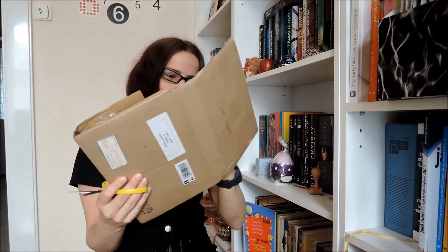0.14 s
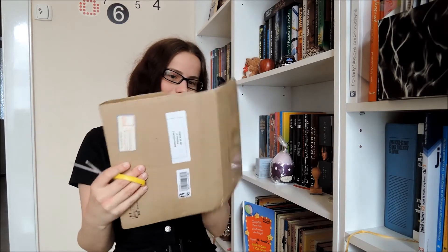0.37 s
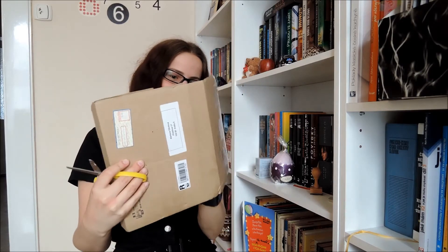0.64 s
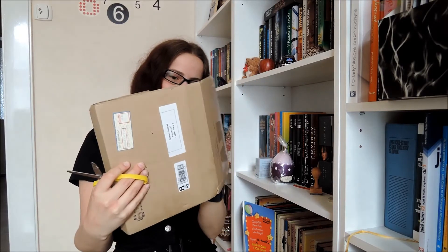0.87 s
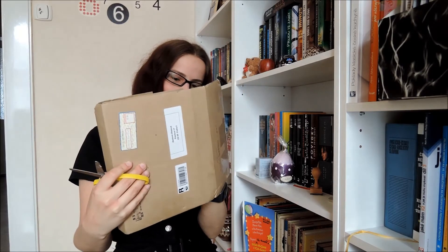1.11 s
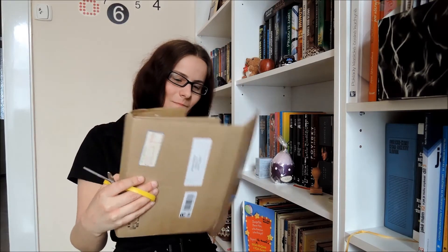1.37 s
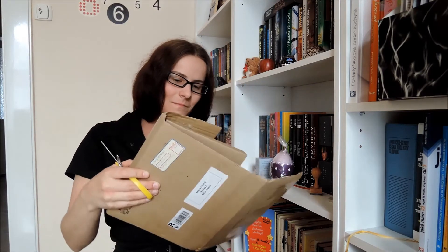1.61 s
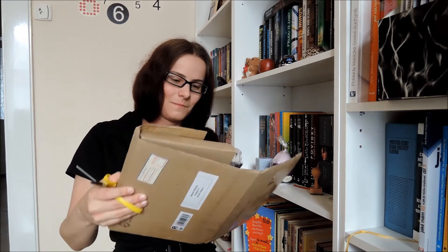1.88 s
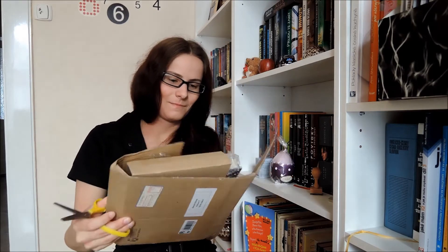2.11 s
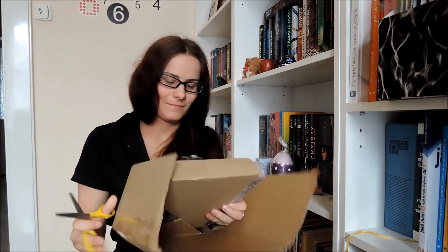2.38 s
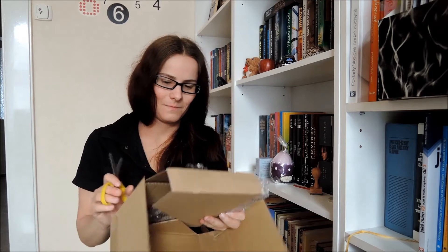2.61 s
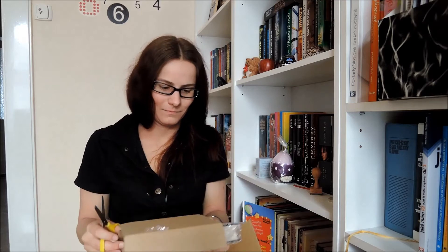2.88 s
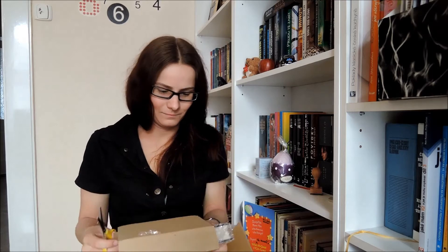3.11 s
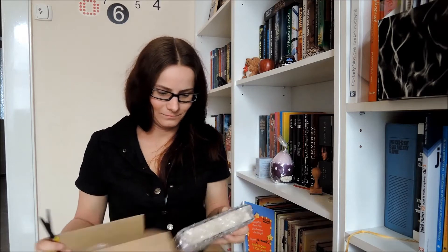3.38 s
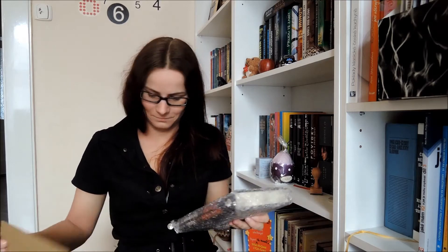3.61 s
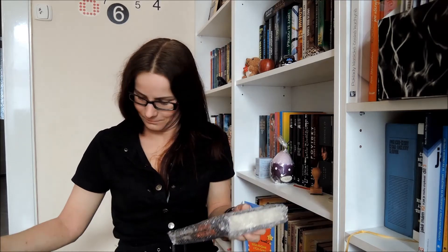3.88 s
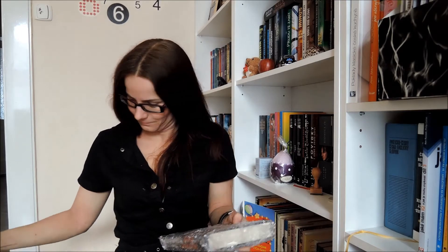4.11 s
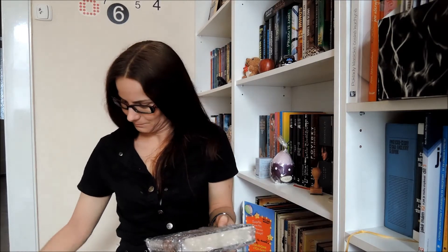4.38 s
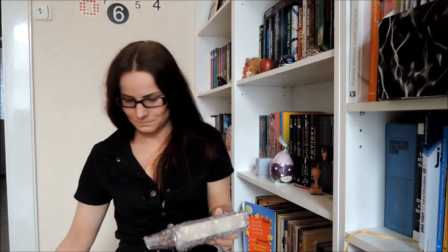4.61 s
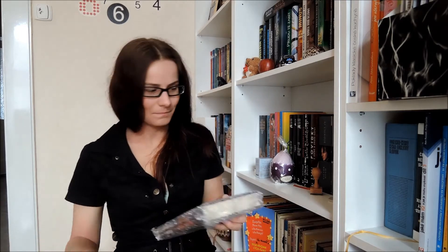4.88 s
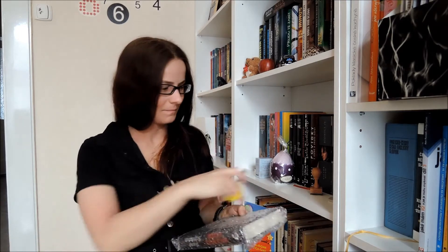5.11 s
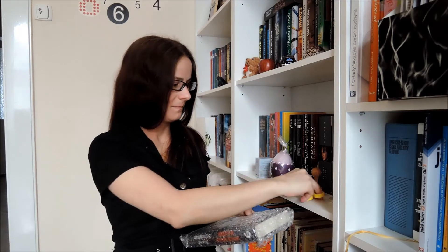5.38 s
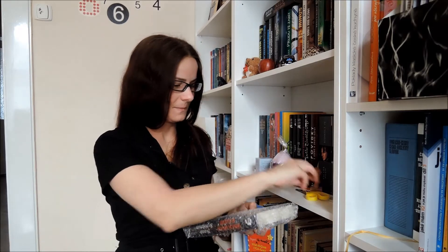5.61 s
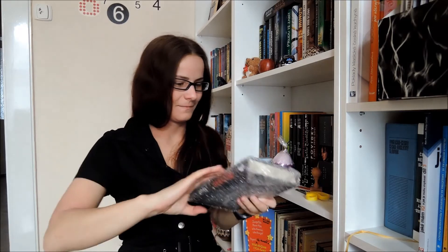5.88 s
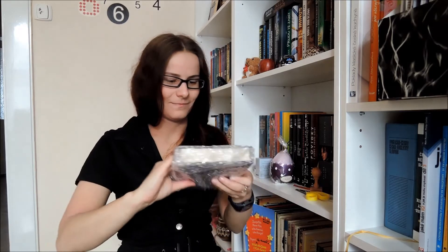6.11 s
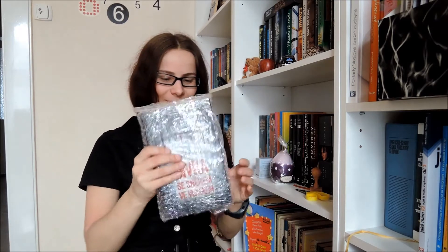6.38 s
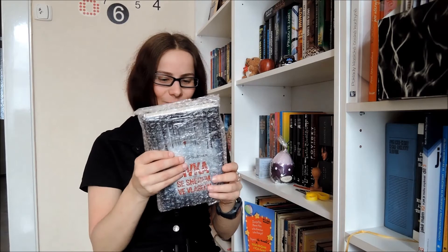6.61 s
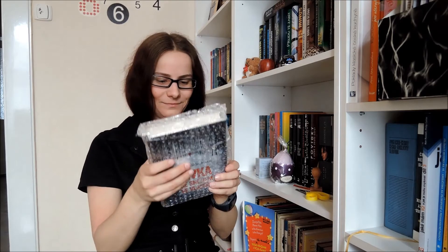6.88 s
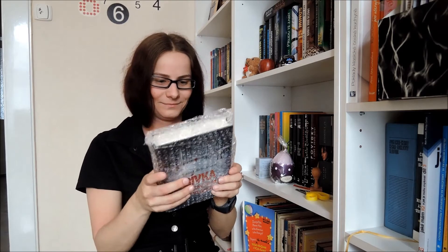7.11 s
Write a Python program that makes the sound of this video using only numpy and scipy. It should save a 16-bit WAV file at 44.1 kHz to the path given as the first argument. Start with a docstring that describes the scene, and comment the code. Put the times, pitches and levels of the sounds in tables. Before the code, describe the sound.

A cardboard parcel is rustled, creased and thumped down, scissors clack onto a shelf, then bubble wrap crackles softly in a small room.

```python
"""A cardboard parcel is folded open and put down in a small furnished room, heard in stereo by close
microphones: clumped slips of card on card feed rubs and hiss, struck resonances make the snapping creases and
hollow thuds. A book is pulled out of its slot with rasping narrow noise; scissors laid on a shelf clack as a
bank of ringing modes. Last, a book in bubble wrap is turned in the hands: grainy crackle and short pops. Delays
give the room's answer, and shaped noise with a wavering hum gives its tone."""
import sys
import numpy as np
from scipy import signal
from scipy.io import wavfile

SR = 44100
rng = np.random.default_rng(int(sys.argv[2]) if len(sys.argv) > 2 else 0)


def wrap_up_sound(samples):
    """Save the sound to the file named by the first command line argument, as 16-bit audio."""
    columns = np.atleast_2d(samples).T
    # keep every value between -1 and 1, then stretch to whole-number steps
    tamed = np.clip(columns, -1, 1)
    steps = np.round(tamed * 32767).astype(np.int16)
    wavfile.write(sys.argv[1], SR, steps)


def decibels_to_gain(level_db):
    """Convert a level in decibels to a linear amplitude gain (20 dB per decade)."""
    exponent = np.asarray(level_db, float) / 20
    return 10 ** exponent


N = 319284  # samples


def rms_one(x):
    """Scale to rms 1."""
    return x / np.sqrt(np.mean(x ** 2) + 1e-20)


def in_time(rows):
    """Columns of a table over time, joined by straight lines and held beyond the ends."""
    s, *columns = np.transpose(rows)
    return [np.interp(np.arange(N) / SR, s, column) for column in columns]


def at_hz(points, hz):
    """Read a spectrum on a log-frequency axis."""
    table_hz, table_db = np.transpose(points)
    return np.interp(np.log(hz), np.log(table_hz), table_db)


def drift(rate_hz):
    """Slow random wander of spread 1: noise through two equal poles, computed every 40 samples."""
    r = np.exp(-2 * np.pi * rate_hz * 40 / SR)
    noise = rng.standard_normal(N // 40 + 2002)
    slow = signal.lfilter([1], [1, -2 * r, r * r], noise)[2000:]  # skip the settling
    return np.interp(np.arange(N) / 40, np.arange(len(slow)), rms_one(slow))


def ring(clicks, hz, t60_s):
    """A two-pole resonance: a unit click sets a decaying sine of height 1 ringing."""
    r, w = decibels_to_gain(-60 / (t60_s * SR)), 2 * np.pi * hz / SR
    return signal.lfilter([0, np.sin(w)], [1, -2 * r * np.cos(w), r * r], clicks + 1e-18)


def add(out, s, sound):
    """Lay a short sound into the track."""
    i = round(s * SR)
    out[i:i + len(sound)] += sound[:N - i]


def slips(per_s, spread_db, clump_db):
    """Surfaces catch and let go: clumped clicks of uneven size, rms 1."""
    sizes = decibels_to_gain(spread_db * np.minimum(rng.exponential(1, N), 5)) * rng.choice([-1, 1], N)
    chance = per_s * decibels_to_gain(clump_db * drift(25)) / SR
    return rms_one(sizes * (rng.random(N) < chance))


SWELL_DB = 20  # a gesture rises by this much in its rise time and sinks as much in its fade time


def gestures(rows):
    """Every row swells to its peak and fades, straight in dB; powers add, one gain track per level column."""
    t, power = np.arange(0, N, 32) / SR, 1e-12
    for peak_s, rise_s, fade_s, *levels_db in rows:
        below_db = SWELL_DB * np.where(t < peak_s, (peak_s - t) / rise_s, (t - peak_s) / fade_s)
        power = power + decibels_to_gain(2 * (np.array(levels_db)[:, None] - below_db))
    return [np.interp(np.arange(N) / SR, t, np.sqrt(p)) for p in power]


# How alike the two microphone channels are. Each row: frequency in Hz, left-right likeness from -1 to 1.
LIKENESS = [(60, 0.84), (500, 0.057), (2000, 0.51), (4000, 0.48), (8000, -0.2)]
NEAR_SPREAD = 0.24  # things in the hands sound narrower than the room tone


def surface(spectrum, patchy_db, grains, grainy, spread=NEAR_SPREAD):
    """Noise and grains in 0.4-octave bands, each with its own level, flicker and stereo likeness; rms 1."""
    out, together = 0, drift(18)
    low_hz, high_hz = spectrum[0][0], spectrum[-1][0]
    edges = low_hz * 2 ** np.arange(0, np.log2(high_hz / low_hz) + .2, .4)
    share = np.clip(grainy, 0, 1)
    # two mid-and-side pairs, so that neighbouring bands draw on different noise
    source = np.sqrt(1 - share) * rng.standard_normal((2, 2, N))
    source[:, 0] += np.sqrt(share) * grains * [[1], [-1]]
    # grains reach the side 9 samples late, with random signs
    source[:, 1] += np.sqrt(share) * np.roll(grains, 9) * rng.choice([-1, 1], N)
    for k, (low, high) in enumerate(zip(edges, edges[1:])):
        band = signal.butter(2, [low, high], "band", fs=SR, output="sos")
        mid, side = signal.sosfilt(band, source[k % 2])
        hz = np.sqrt(low * high)
        alike = np.clip(1 - spread * (1 - at_hz(LIKENESS, hz)), -1, 1)
        flicker_db = patchy_db * (.7 * together + drift(9))
        stereo = np.sqrt(1 + alike) * mid + np.sqrt(1 - alike) * side * [[1], [-1]]
        out = out + decibels_to_gain(at_hz(spectrum, hz) + flicker_db) * stereo
    return rms_one(out)


def card_modes(fibres, spectrum, low_hz, high_hz, count, cycles, wander_db):
    """The grip keeps changing, so many close modes of the card come and go under the slips; rms 1."""
    total = 0
    for hz in np.geomspace(low_hz, high_hz, count) * (1 + .03 * rng.standard_normal(count)):
        level = decibels_to_gain(at_hz(spectrum, hz) + wander_db * drift(6.1))
        # sqrt(hz): modes lie further apart higher up, so each stands for a wider band
        total = total + level * np.sqrt(hz) * rms_one(ring(fibres, hz, cycles / hz))
    return rms_one(total)


# The parcel keeps moving in the hands. Each row: time in seconds, rubbing level in dB, surface hiss in dB.
MOVING = [(0.0, -46, -44), (0.33, -45, -48.5), (0.5, -55.5, -73), (1.39, -65, -64), (1.62, -57.5, -64.5),
          (1.88, -52.5, -51.5), (2.22, -47, -47), (2.45, -55, -47), (2.74, -45.5, -42), (2.86, -46, -45.5),
          (3.15, -46, -54), (3.5, -46.5, -40), (3.69, -50.5, -58), (4.12, -97, -124), (4.6, -92.5, -71),
          (5.06, -49.5, -68), (5.14, -48, -50.5), (5.33, -54, -54.5), (5.5, -66, -92), (5.95, -72, -68)]
# Single rubs of card, hand or shelf. Each row: peak, rise and fade in seconds, rubbing in dB, hiss in dB.
RUBS = [(0.18, 0.0055, 0.11, -32.5, -38), (0.38, 0.15, 0.086, -34, -48), (0.56, 0.0092, 0.23, -48, -58),
        (0.63, 0.061, 0.25, -70, -48.5), (0.79, 0.025, 0.22, -54.5, -58), (0.92, 0.011, 0.5, -61, -63),
        (1.02, 0.0092, 0.21, -43, -47), (1.48, 0.14, 0.39, -44.5, -50.5), (1.95, 0.05, 0.059, -38.5, -43),
        (2.39, 0.1, 0.096, -42.5, -41), (2.58, 0.045, 0.43, -46.5, -43.5), (2.83, 0.2, 0.015, -38, -40.5),
        (3.02, 0.28, 0.14, -41, -39), (3.2, 0.058, 0.074, -41, -38.5), (3.61, 0.15, 0.057, -34.5, -44),
        (3.735, 0.059, 0.35, -50.5, -52), (4.18, 0.011, 0.13, -47.5, -50), (4.638, 0.0033, 0.57, -36, -45),
        (4.7, 0.094, 0.16, -35.5, -42.5), (4.795, 0.033, 0.14, -43, -47.5),
        (4.927, 0.017, 0.083, -33.5, -57.5), (5.349, 0.015, 0.14, -39, -74), (5.51, 0.0023, 0.35, -42, -56)]
# Shoves that bend the parcel. Each row: peak, rise and fade in seconds, panel flex in dB, hollow box in dB.
SHOVES = [(0.05, 0.082, 0.99, -54, -57), (0.19, 0.042, 0.24, -64, -54), (0.41, 0.31, 0.055, -47, -48),
          (1.01, 0.0082, 0.46, -65, -60), (1.48, 0.035, 1, -69, -58), (1.98, 0.092, 0.2, -65, -56),
          (2.37, 0.047, 0.25, -47.5, -70), (2.85, 0.86, .1, -53.5, -56.5), (2.88, 0.018, 0.74, -47, -39),
          (3.2, 0.072, 0.87, -55.5, -79), (3.59, 0.053, 0.077, -42, -42.5), (4.66, 0.039, .3, -57, -63),
          (4.73, 0.064, 0.063, -37, -61), (4.89, 0.036, 0.41, -48, -40), (5.1, 0.3, 0.5, -48, -49.5)]
# Spectra of the rub, its hiss and the flexing panels. Each row: frequency in Hz, relative level in dB per Hz.
CARD_SPECTRUM = [(500, -105), (584, 1), (1040, 2), (1500, 9.5), (1990, 1.5), (2190, -5.5), (6000, -14.5),
                 (7800, -22), (13200, -120)]
HISS_SPECTRUM = [(1760, -42.5), (3000, 21), (3560, 6), (5760, -1), (7740, 3), (10700, 7), (14100, -49),
                 (15500, -20)]
FLEX_SPECTRUM = [(21, -33), (35, -8), (113, 0.5), (156, 0), (280, -6.5), (360, -58)]
# Modes of the hollow box. Each row: frequency in Hz, relative level in dB, t60 in seconds.
BOX_MODES = [(310, 7.5, 0.034), (388.4, 23, 0.039), (427, 7.5, 0.11), (497, 12, 0.054), (549, 3, 0.13)]
FLEX_FOLLOWS_DB = -16.5  # the panels also flex with all rubbing


def handling():
    """Card slides on card: the same slips feed the rub and the hiss; the big panels flex below."""
    rubbing, hissing = np.hypot(decibels_to_gain(np.array(in_time(MOVING))), gestures(RUBS))
    bending, booming = gestures(SHOVES)
    fibres, bumps = slips(2500, 3.2, 4.5), slips(300, 2.5, 3.0)

    sheet = surface(CARD_SPECTRUM, 2.4, fibres, .45)
    sheet_modes = card_modes(fibres, CARD_SPECTRUM, 620, 2700, count=30, cycles=50, wander_db=4.5)
    rub = rubbing * (.7 * sheet + .7 * sheet_modes)

    fizz = surface(HISS_SPECTRUM, 2.2, fibres, .4, spread=.55)
    fizz_modes = card_modes(fibres, HISS_SPECTRUM, 8800, 12300, count=14, cycles=55, wander_db=7)
    hiss = hissing * (.9 * fizz + .4 * fizz_modes)

    flexing = np.hypot(bending, decibels_to_gain(FLEX_FOLLOWS_DB) * rubbing)
    flex = flexing * surface(FLEX_SPECTRUM, 4.0, bumps, 0.6)

    # bumps and slips ring the modes of the hollow box
    hollow = sum(decibels_to_gain(level_db + 2.5 * drift(6)) * ring(bumps + fibres, hz, t60_s)
                 for hz, level_db, t60_s in BOX_MODES)
    return rub + hiss + flex + booming * rms_one(hollow)


# Spectrum of the room tone. Each row: frequency in Hz, relative level in dB per Hz.
AIR_SPECTRUM = [(12, -34), (20, 12.5), (38, -6), (64, -6.5), (103, -6), (382, -12.5), (1920, -16),
                (6540, -29), (10800, -27), (13100, -31), (15500, -78)]
AIR_DB = -55  # rms
HUM_HZ, HUM_DB = 99, -65.5  # centres of the wavering pitch and peak level


def air():
    """Room tone, a wide shaped noise, with a hum whose pitch and level waver."""
    hum_level = decibels_to_gain(HUM_DB + 1.2 * drift(11.0))
    hum = hum_level * np.sin(2 * np.pi * np.cumsum(HUM_HZ + 3.8 * drift(1.8)) / SR)
    return decibels_to_gain(AIR_DB) * surface(AIR_SPECTRUM, 0.57, np.zeros(N), 0, spread=1) + hum


ROOM_T60_S, WALL_CUT_HZ = 0.52, 5700  # bass decay, and the lowpass met on every round


def room(x):
    """Eight feedback delays a side, duller on every round, stepped block by block."""
    out, dull = np.zeros((2, N)), np.exp(-2 * np.pi * WALL_CUT_HZ / SR)
    for k, lag in enumerate((rng.uniform(.008, .03, 16) * SR).astype(int)):
        loop, gain, state = x.copy(), decibels_to_gain(-60 * lag / SR / ROOM_T60_S), [0.]
        for i in range(lag, N, lag):
            back, state = signal.lfilter([gain * (1 - dull)], [1, -dull], loop[i - lag:i], zi=state)
            loop[i:i + lag] += back[:N - i]
        out[k % 2] += (loop - x) * (-1) ** (k // 2)
    # close microphone ports hear nearly the same room in the bass
    mid, side = (out[0] + out[1]) / 2, (out[0] - out[1]) / 2
    side = signal.lfilter(*signal.butter(2, 2500, "high", fs=SR), side)
    return np.array([mid + side, mid - side])


# Creases of the card snap. Each row: start in seconds, peak of the body in dB, ring in Hz,
# treble crack in dB against the body.
SNAPS = [(0.162, -28.5, 1420, -4), (0.178, -30, 2040, 4), (0.193, -12, 1760, -5), (0.885, -41, 3100, -7),
         (0.922, -23, 953, -29), (1.019, -19, 2800, -16), (1.11, -38, 620, -26), (1.497, -29, 3000, -28),
         (1.897, -34, 3900, -3), (2.377, -29.5, 1420, 7), (2.829, -26, 2340, 1), (2.878, -21.5, 900, -5.5),
         (2.923, -13, 800, -18.5), (2.94, -23.5, 2500, -13), (2.946, -24, 740, -26), (3.0, -23, 1060, -10),
         (3.175, -32, 855, -4), (3.21, -27.5, 2600, -12), (4.176, -31, 2800, -13), (4.676, -22, 1310, -20),
         (4.792, -27, 2630, -20), (4.844, -27, 2370, -29), (4.923, -30, 1400, -9)]


def snaps():
    """A few milliseconds of crackle strike broad card resonances; a bright crack rides on top."""
    out, t = np.zeros(N), np.arange(3000) / SR
    for s, peak_db, hz, treble_db in SNAPS:
        fade = np.exp(-t / .0015) + .18 * np.exp(-t / .012)
        crackle = rng.standard_normal((3, len(t))) * fade
        body = ring(crackle[0], hz, 9 / hz)
        body = body + .9 * ring(crackle[2], 1.9 * hz, 5 / hz)
        body = body + .6 * ring(crackle[1], .5 * hz, 4 / hz)
        crack = ring(crackle[1], 10000, 0.0019) + 0.19 * ring(crackle[0], 5600, 0.00022)
        snap = body / np.abs(body).max() + decibels_to_gain(treble_db) * crack / np.abs(crack).max()
        add(out, s, decibels_to_gain(peak_db) * snap)
    return out


# The hollow box knocks. Each row: start in seconds, peak in dB, ring in Hz,
# t60 in seconds (of the rattle, and of the ring up to a cap in cycles).
THUDS = [(0.165, -36.5, 384, 0.089), (0.354, -28, 122, 0.081), (1.022, -27, 507, 0.023),
         (1.96, -41.5, 162, 0.097), (2.874, -28, 90, 0.065), (2.905, -26.5, 380, 0.11),
         (2.975, -26.5, 454, 0.044), (3.175, -26, 715, 0.026), (3.355, -38.5, 146, 0.055),
         (3.579, -46, 210, 0.075), (4.669, -30, 102, 0.27), (4.701, -27.5, 616, 0.23),
         (4.745, -35, 598, 0.2), (4.8431, -18, 446, 0.047), (4.856, -24.5, 700, 0.17),
         (4.877, -24, 409, 0.097), (4.925, -28.5, 372, 0.2), (6.212, -42.5, 310, 0.042)]


def thuds():
    """A soft push and the rattle after it ring the box and its air: a main mode with two neighbours."""
    out, t = np.zeros(N), np.arange(14000) / SR
    for s, peak_db, hz, t60_s in THUDS:
        rattle = 0.11 * rng.standard_normal(len(t)) * decibels_to_gain(-60 * t / t60_s) * (t * hz > .7)
        push = t * hz * np.exp(-t * hz * 7.75) + rattle
        push = signal.lfilter([.15], [1, -.85], push)  # soften
        detune = 1 + 0.021 * rng.standard_normal(2)
        body = ring(push, hz, min(24 / hz, t60_s))
        body = body + .4 * ring(push, .88 * hz * detune[0], min(16 / hz, t60_s))
        body = body - .25 * ring(push, 1.5 * hz * detune[1], 12 / hz)
        add(out, s, decibels_to_gain(peak_db) * body / np.abs(body).max())
    return out


# A book is pulled out of its slot. Each row: time in seconds, gliding gap resonance in Hz, its level in dB, #
# low gap level in dB, high gap level in dB.
SLIDE = [(1.95, 1106, -78, -71, -85), (2.2, 1143, -78, -54.5, -78), (2.45, 1271, -52, -55.5, -81),
         (2.6, 1453, -47.5, -46, -77), (2.72, 1854, -46, -54, -67), (2.82, 1978, -51.5, -50, -71),
         (3.03, 2020, -41, -38.5, -64), (3.13, 2060, -55, -50, -75), (3.18, 2060, -74, -73, -90)]


def slot():
    """Gaps around the book sliding out of its slot resonate: rasping narrow noise, one centre gliding, two
    nearly still."""
    glide_hz, *levels_db = in_time(SLIDE)
    out = 0
    for centre_hz, level_db in zip((glide_hz, np.full(N, 740), np.full(N, 3550)), levels_db):
        narrow = signal.lfilter([.01], [1, -.99], rng.standard_normal((2, N)))
        turn = 2 * np.pi * np.cumsum(centre_hz * (1 + .02 * drift(8))) / SR
        rasp = rms_one(narrow[0] * np.cos(turn) + narrow[1] * np.sin(turn))
        out = out + decibels_to_gain(level_db + 4 * drift(20)) * rasp
    return out


# Scissors touch the shelf and rock. Each row: start in seconds, peak in dB ahead of the bass cut,
# brightness in dB per octave.
TOUCHES = [(5.511, -14, 1), (5.544, -32, -3.5), (5.559, -33, 1), (5.574, -32, -2), (5.631, -30.5, 0),
           (5.695, -31, -3.5), (5.76, -44, -2)]
# Modes of the handles and shelf, then of the blades, which ring on.
# Each row: frequency in Hz, relative level in dB, t60 in seconds.
SHELF_MODES = [(339, -4.5, 0.18), (723, 6, 0.05), (874, 7.5, 0.031), (1039, 9, 0.061), (1400, -1, 0.051),
               (2060, 11, 0.013), (3080, 6.5, 0.022)]
BLADE_MODES = [(2008, -7, .13), (2406, -9, .13), (3241, -6, .12), (4517, -14, .1), (5486, -15, .11)]


def scissors():
    """Each touch is a short rough chatter that strikes every mode with a strength of its own."""
    out, t = np.zeros(N), np.arange(16000) / SR
    # the last two are so short that they sound as a click
    modes = SHELF_MODES + BLADE_MODES + [(3100, 22.5, 0.00092), (10500, 11.5, 0.0014)]
    rough = np.minimum(t / .001, 1) * (np.exp(-t / .004) + .08 * np.exp(-t / .035))
    for s, peak_db, bright_db in TOUCHES:
        clack = 0
        for own_db, (hz, level_db, t60_s) in zip(rng.normal(0, 1.5, len(modes)), modes):
            strength = decibels_to_gain(level_db + own_db + bright_db * np.log2(hz / 1000))
            clack = clack + strength * ring(rough * rng.standard_normal(len(t)), hz, t60_s)
        add(out, s, decibels_to_gain(peak_db) * clack / np.abs(clack).max())
    return signal.lfilter(*signal.butter(2, 220, "high", fs=SR), out)


# Fingers squeeze the wrap. Each row: peak, rise and fade in seconds, level in dB.
SQUEEZES = [(6.05, 0.015, 0.26, -58), (6.211, 0.023, 0.16, -44), (6.505, 0.026, 0.2, -46),
            (6.555, 0.21, 0.099, -50.5), (6.63, .02, 0.048, -52), (6.69, 0.013, 0.17, -51),
            (6.87, 0.15, 0.073, -62), (6.99, 0.21, 0.055, -53), (7.05, 0.067, 0.58, -55)]
# Spectrum of the film. Each row: frequency in Hz, relative level in dB per Hz.
FILM_SPECTRUM = [(530, -40), (900, -4), (944, -17), (1820, 0), (4390, -3), (10100, -2.5), (14100, -9),
                 (15500, -43.5)]


def wrap():
    """Squeezed film crackles in dense clumps of uneven clicks."""
    return gestures(SQUEEZES)[0] * surface(FILM_SPECTRUM, 1.8, slips(1200, 3.6, 6.0), .6)


# Loudest pops of the wrap. Each row: start in seconds, peak in dB, treble rings in dB against the low one.
POPS = [(6.209, -32, -5), (6.217, -35, 0), (6.225, -33, -13), (6.304, -36, -11), (6.4986, -32, 7),
        (6.5252, -32, 0), (6.549, -34, 7), (6.584, -41, 15), (6.625, -32.5, -23), (6.6902, -32, -3),
        (6.9237, -28.5, 9), (6.9432, -40, -7), (7.072, -37, 10)]


def pops():
    """The film buckles: a burst of noise rings very short, broad resonances, some pops dull, some bright."""
    out, t = np.zeros(N), np.arange(600) / SR
    for s, peak_db, treble_db in POPS:
        buckle = rng.standard_normal((3, len(t))) * np.exp(-t / 0.00028)
        treble = ring(buckle[1], 9600, 0.0012) + ring(buckle[2], 10500, 0.0027)
        pop = ring(buckle[0], 3030, 0.0017) + decibels_to_gain(treble_db) * treble
        add(out, s, decibels_to_gain(peak_db) * pop / np.abs(pop).max())
    return out


ROOM_DB = -15.5  # gain of the room's answer


def scene():
    """Everything but the room tone sits a little to the right; the room answers hits fully and rubbing less."""
    hits = snaps() + thuds() + slot() + scissors() + pops()
    rustle = handling() + wrap()
    wet = decibels_to_gain(ROOM_DB) * room(hits + 0.43 * rustle.mean(axis=0))
    to_the_right = decibels_to_gain(np.array([[-.5], [.5]]))
    return (hits + rustle + wet) * to_the_right + air()


def low_pass(x):
    """Removes everything above the highest recorded frequency."""
    return signal.sosfilt(signal.butter(12, 16470, fs=SR, output="sos"), x)


def record(dry):
    """A steep lowpass cuts the top, down 60 dB from 16.3 kHz."""
    mix = signal.sosfilt(signal.cheby2(10, 60, 16300, fs=SR, output="sos"), dry)
    return low_pass(mix)


dry = scene()
out = record(dry)
wrap_up_sound(out)
```